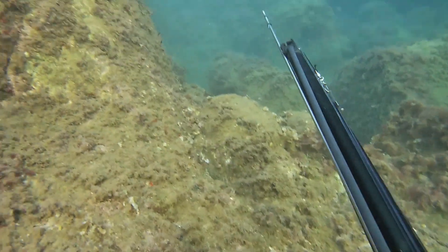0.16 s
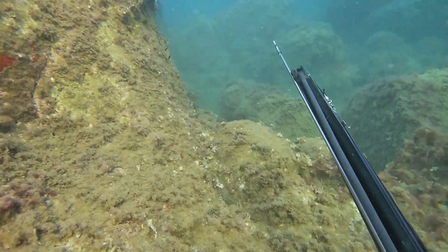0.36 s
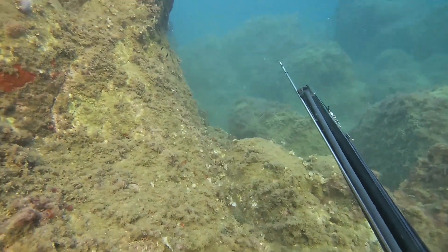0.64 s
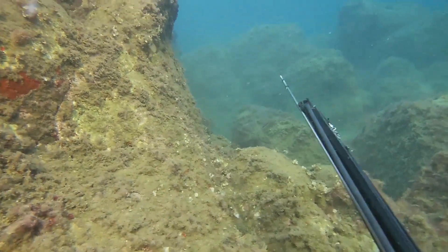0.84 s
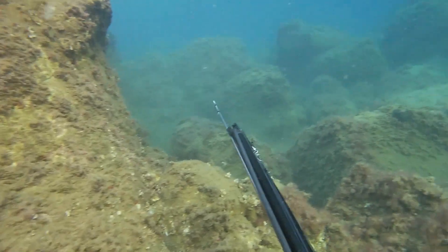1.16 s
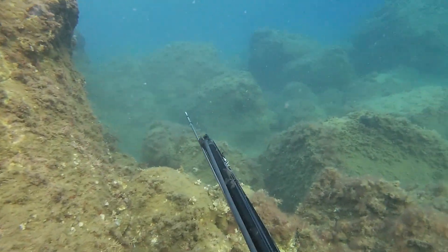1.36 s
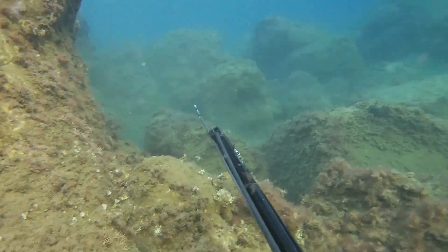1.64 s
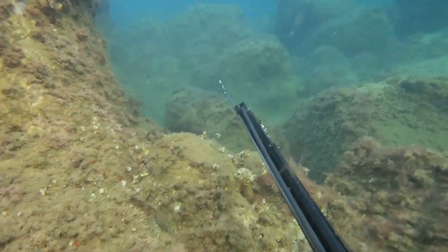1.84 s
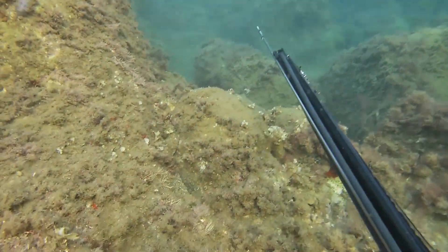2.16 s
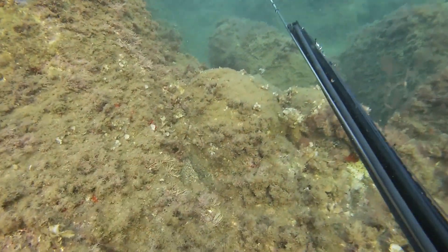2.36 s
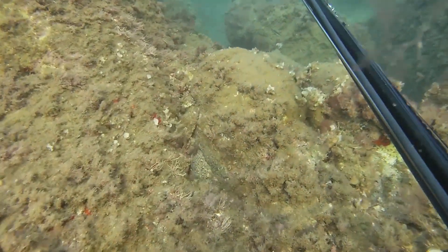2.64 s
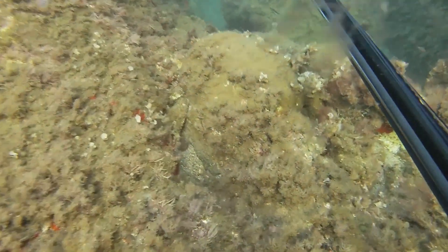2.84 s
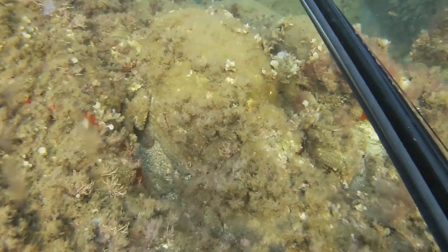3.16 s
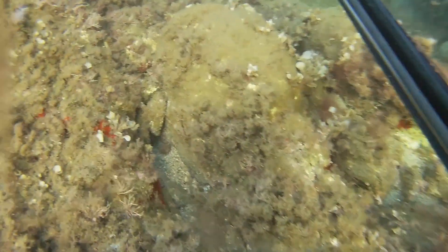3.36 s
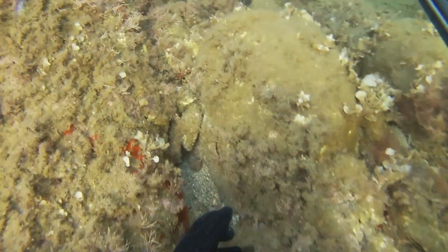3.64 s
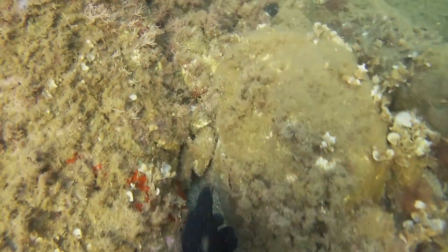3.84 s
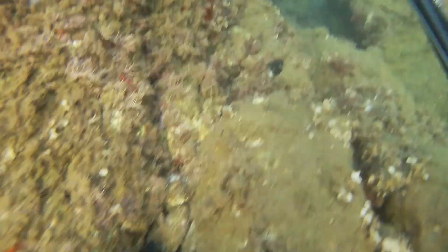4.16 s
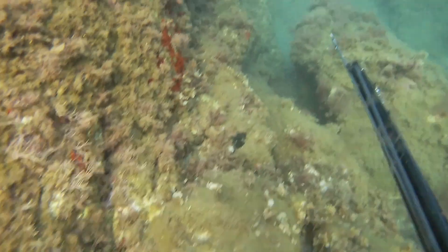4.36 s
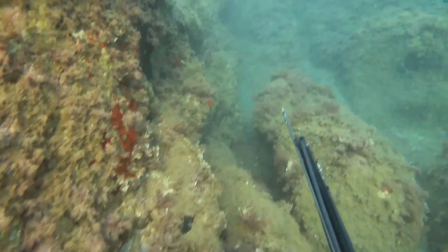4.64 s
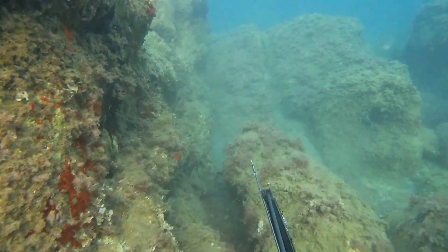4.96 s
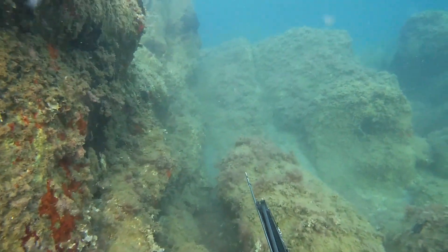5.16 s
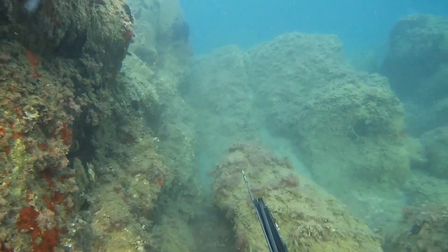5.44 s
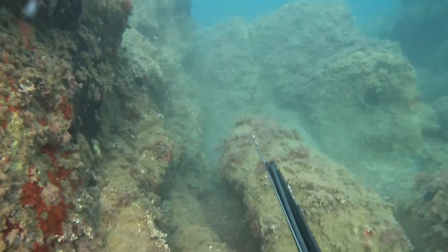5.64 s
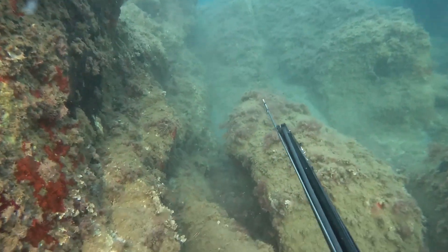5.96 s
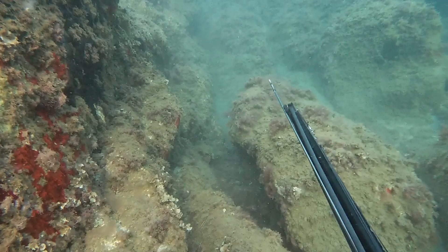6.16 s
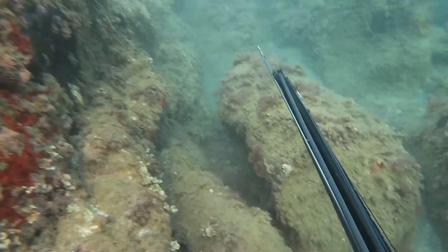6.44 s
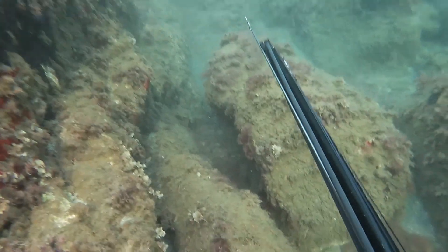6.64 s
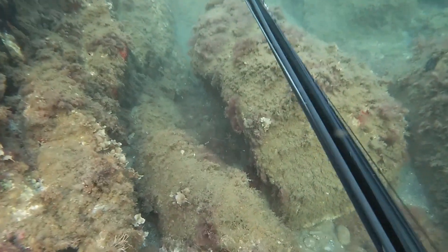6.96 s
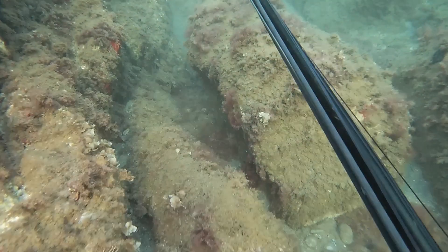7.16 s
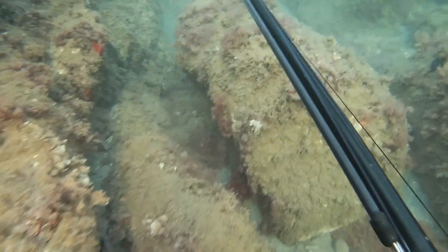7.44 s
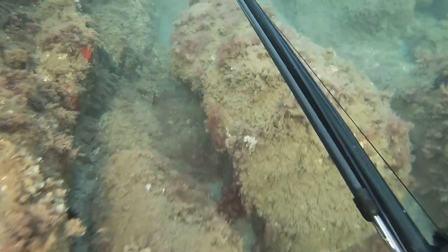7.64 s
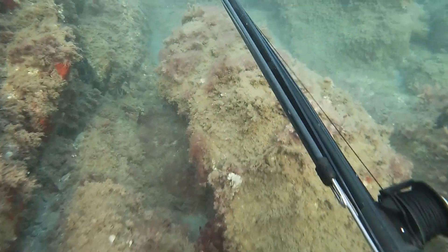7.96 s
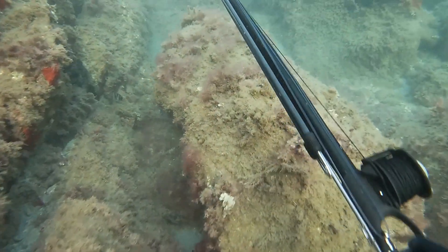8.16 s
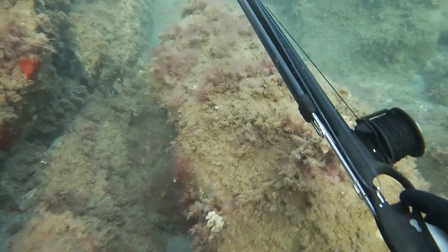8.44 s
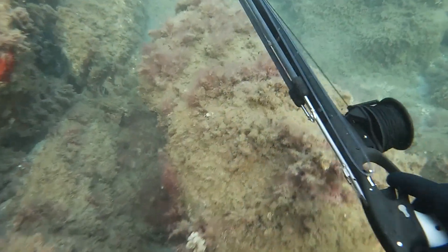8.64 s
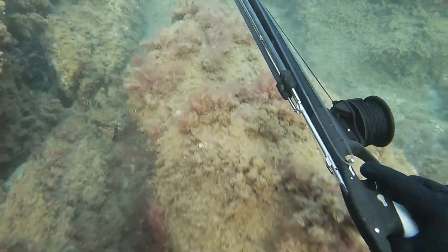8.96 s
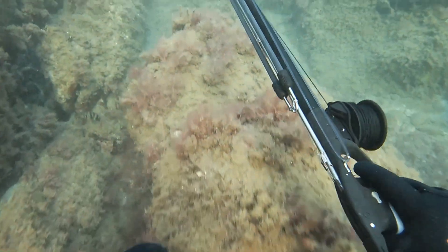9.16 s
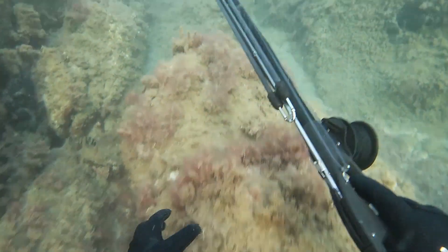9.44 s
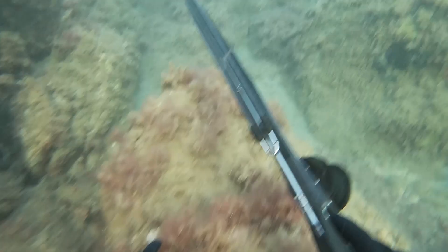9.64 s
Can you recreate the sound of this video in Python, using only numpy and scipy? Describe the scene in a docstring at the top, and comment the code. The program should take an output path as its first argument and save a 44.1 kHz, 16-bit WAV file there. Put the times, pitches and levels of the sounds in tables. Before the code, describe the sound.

Underwater reef crackling like dry twigs, loud clicks over faint sizzle, while a gliding diver's camera housing hums, rumbles and occasionally knocks.

```python
"""A rocky seabed alive with snapping shrimp, heard through the case of a diver's underwater camera.
Each snap is a collapsing bubble: a sharp pulse, scattered by the rocks, that rings the case.
Random snaps and a faint sizzle fill in the reef behind the loud, near shrimp.
As the diver glides, water hums and rumbles on the case, gear rubs and knocks, and bubbles gurgle."""
import sys
import numpy as np
from scipy import signal
from scipy.fft import rfft, irfft
from scipy.io import wavfile
from scipy.ndimage import uniform_filter1d

SR = 44100
rng = np.random.default_rng(int(sys.argv[2]) if len(sys.argv) > 2 else 0)


def inscribe(sig):
    """Save sig as 16-bit PCM at rate SR to the path in sys.argv[1].

    A 1-D sig is mono; a 2-D sig holds one channel per row.
    Samples are clipped to [-1, 1] before scaling.
    """
    pcm = np.round(np.clip(np.atleast_2d(sig).T, -1, 1) * 32767)
    wavfile.write(sys.argv[1], SR, pcm.astype(np.int16))


N = 432180  # length in samples

SIZE = 4096  # length of every short sound, in samples
HZ = np.fft.rfftfreq(SIZE, 1 / SR) + 1  # its frequencies, raised 1 Hz to keep logarithms finite
AGE = np.arange(SIZE) / SR  # seconds since it began

# how strongly the reef's random crackle comes through: t/s, level/dB
REEF_LEVEL = [(0, -56), (1.35, -54.5), (1.6, -53.5), (2.1, -53.5), (2.42, -57), (2.6, -56), (3.4, -57),
              (4.0, -58.5), (4.25, -59), (4.7, -58.5), (5.25, -56), (6.5, -58), (7.6, -58), (8.3, -57.5),
              (9.3, -58.5), (9.8, -60)]
# strokes that push the camera through the water: middle t/s, length/s, rumble level/dB, sway level/dB
STROKES = [(.2, 1, -58, -39), (1.7, 0.26, -55, -44.5), (3.05, 0.43, -52, -49), (3.596, 0.33, -58, -61),
           (4.225, 0.68, -47, -39), (4.794, 0.48, -44.5, -45), (5.768, 0.83, -49, -32.5),
           (6.78, 0.25, -49.5, -64), (8.393, 0.41, -49.5, -39), (9.769, 0.17, -55, -32.5)]


def amp(db):
    """Decibels to gain."""
    return 10 ** (np.asarray(db) / 20)


def evened(x):
    """Scales to rms 1."""
    return x / np.sqrt(np.mean(x ** 2) + 1e-20)


def level(rows):
    """A level curve in dB as a gain for every sample."""
    s, db = np.transpose(rows)
    return amp(np.interp(np.arange(N) / SR, s, db))


def colour(points):
    """A few spectrum points as a gain for every frequency in HZ."""
    hz, db = np.transpose(points)
    return amp(np.interp(np.log(HZ), np.log(hz), db))


def noise(gain):
    """Steady noise of the given colour, at rms 1."""
    spectrum = rfft(rng.standard_normal(N))
    return evened(irfft(spectrum * np.interp(np.fft.rfftfreq(N, 1 / SR), HZ, gain), N))


def flutter(per_s, depth_db):
    """A gain that wanders between random values, per_s of them a second."""
    knots = rng.standard_normal(N // 100)
    wander = np.interp(np.arange(N) / SR * per_s, np.arange(len(knots)), knots)
    return amp(depth_db * wander)


def arch(s, length_s):
    """A smooth swell and fade around a time."""
    return np.cos(np.pi * np.clip((np.arange(N) / SR - s) / length_s, -.5, .5)) ** 2


def add(mix, s, sound):
    """Mixes a sound in at a time."""
    part = mix[max(round(s * SR), 0):][:len(sound)]
    part += sound[:len(part)]


def ring(x, gain):
    """Passes a short sound through a causal, minimum-phase filter: sharp start, ringing after."""
    cepstrum = irfft(np.log(np.maximum(gain / gain.max(), 1e-5)))
    fold = 1 + np.sign(SIZE / 2 - np.arange(SIZE))  # moves the response wholly after the start
    return irfft(rfft(x) * np.exp(rfft(cepstrum * fold) - cepstrum[0]))


def housing(uneven_db=0):
    """What the case lets through; sound from any one direction rings its resonances unevenly."""
    # resonances of the case: f/Hz, width/Hz, level/dB
    resonances = [(640, 40, -16), (747.5, 40, -6), (925, 55.6, -2), (1121, 85, -4.5), (1299, 64, -5),
                  (1524, 83, 0), (1800, 94, 1.5), (2082, 117, -1.5), (2253, 99, -3.5), (2990, 260, -2),
                  (3227, 210, -2), (3630, 310, -11.5), (4263, 155, -3.5), (4586, 180, -3.5),
                  (5000, 160, -4.5), (5320, 350, -9), (6030, 810, -13), (7110, 230, -12.5),
                  (7835, 340, -12.5), (8525, 436, -14), (10670, 620, -25.5), (12700, 1200, -32.5)]
    hz, width, db = np.transpose(resonances)
    db = db + uneven_db * rng.standard_normal(len(db))
    peaks = amp(db) / (1 + ((HZ[:, None] - hz) / width) ** 2)
    return np.sqrt(np.sum(peaks ** 2, axis=1))


def swishes(centre_hz=360):
    """Eddies brush the case: noise in a low band, with soft swells."""
    # swells of moving water: middle t/s, length/s, level/dB
    swells = [(0.248, 2.1, -68), (3.3, 6.4, -73.5), (5.063, 0.088, -63)]
    band = 1 / (1 + (2 * np.log2(HZ / centre_hz)) ** 4)
    return noise(band) * sum(amp(db) * arch(s, length_s) for s, length_s, db in swells)


def swings(swing_hz=10.3):
    """Each stroke sways the case: a slow pressure wave under the rumble."""
    wave = np.sin(2 * np.pi * (swing_hz * np.arange(N) / SR + rng.random()))
    return evened(wave) * sum(amp(db) * arch(s, length_s) for s, length_s, _, db in STROKES)


def swimming(glide_db=-54.5, waver_db=2.8):
    """Water flowing past makes the case hum in lumps; each stroke buffets it with a rumble."""
    # strength of the hum as the flow changes: t/s, level/dB
    flow = [(0, -63.5), (.3, -62), (.6, -70.5), (1.25, -67.5), (1.48, -63), (1.68, -56), (1.8, -72.5),
            (2.2, -78.5), (2.7, -69), (3.1, -64), (3.7, -61), (4.0, -61), (4.3, -65), (4.55, -63),
            (4.8, -63), (5.6, -66), (6.1, -64.5), (6.5, -70), (7.0, -69), (7.17, -61), (7.3, -68),
            (7.58, -66.5), (7.75, -71.5), (8.35, -63.5), (8.5, -68.5), (9.0, -64), (9.35, -62.5),
            (9.8, -62.5)]
    # colour of the hum: f/Hz, level/dB
    hum_colour = [(60, -14), (105, -12), (146, 2), (188, -2), (260, -16.5), (400, -21), (700, -39),
                  (1500, -73)]
    # colour of the rumble: f/Hz, level/dB
    rumble_colour = [(8, 1.5), (22, -4.5), (38, -3), (48, -14), (62, -30.5), (110, -34.5), (300, -57),
                     (1000, -100)]
    hum = level(flow) * noise(colour(hum_colour)) * flutter(per_s=15, depth_db=waver_db)
    glide = amp(glide_db) * flutter(per_s=8, depth_db=waver_db)
    push = glide + sum(amp(db) * arch(s, length_s) for s, length_s, db, _ in STROKES)
    return hum + push * noise(colour(rumble_colour)) + swishes() + swings()


def bubble(hz):
    """The very short note of one small bubble: a sine that swells, then rings down."""
    ring_s = .004
    return AGE * np.exp(-AGE / ring_s) * np.sin(2 * np.pi * hz * AGE) / hz


def blips(count=16):
    """Small bubbles of many sizes, born at random."""
    low_hz, high_hz, per_s = 610, 1300, 130
    out = np.zeros(N)
    for hz in np.geomspace(low_hz, high_hz, count):
        births = rng.uniform(-0.86, 1, N) * (rng.random(N) < per_s / count / SR)
        out += signal.oaconvolve(births, bubble(hz))[:N]
    return evened(out)


def gurgles(count=5):
    """A few bubbles of like size break loose one after another."""
    # flurries of bubbles: start t/s, rms level/dB, middle pitch f/Hz
    flurries = [(2.97, -56, 770), (3.04, -55.5, 760), (3.131, -54.5, 865), (3.21, -58, 716),
                (5.554, -60, 640), (5.665, -60, 640)]
    flurry_s, spread_octaves = .03, .08
    out = np.zeros(N)
    for s, db, hz in flurries:
        flurry = np.zeros(SIZE)
        for k in range(count):
            birth_s = flurry_s * (k + rng.random()) / count
            add(flurry, birth_s, bubble(hz * 2 ** rng.normal(0, spread_octaves)))
        add(out, s, amp(db) * flurry / np.std(flurry[AGE < flurry_s]))
    return out


def bout(start_s, length_s):
    """A rub starts quickly, slackens as it goes on, then dies away."""
    attack_s, sag_db_per_s, release_s = 0.0038, 0.5, 1
    t = np.maximum(np.arange(N) / SR - start_s, 0)
    release = np.exp(-np.maximum(t - length_s, 0) / release_s)
    return np.minimum(t / attack_s, 1) * amp(-sag_db_per_s * t) * release


def rubbing(case, rest_db=-70.5, blips_db=-7.5):
    """Gear rubs in bouts: a hush in the low resonances of the case, with small bubbles freed."""
    # bouts of rubbing as the diver shifts: start t/s, length/s, level/dB
    rubs = [(0, 0.72, -59.5), (1.885, 0.74, -61.5), (2.966, 0.22, -56.5), (3.484, 0.13, -65),
            (5.086, 0.31, -61), (8.9, 0.55, -69.5)]
    rub_hz, rub_octaves, low_db = 780, 0.81, -18.5
    case_band = case / (1 + (np.log2(HZ / rub_hz) / rub_octaves) ** 4)
    low_hush = amp(low_db) / (1 + (HZ / rub_hz) ** 4)
    texture = noise(case_band + low_hush) + amp(blips_db) * blips()
    power = amp(rest_db) ** 2 + sum((amp(db) * bout(s, length_s)) ** 2 for s, length_s, db in rubs)
    return np.sqrt(power) * flutter(per_s=18, depth_db=1.0) * texture


def gear(case, octaves=0.69):
    """Blunt knocks ring the low resonances of the case, with a brief rattle and a low thud."""
    # dull knocks: t/s, clack peak level/dB, centre f/Hz, thud level against the clack/dB
    knocks = [(.671, -32, 1020, -25), (2.815, -28.5, 950, -12), (3.784, -32, 1070, -32),
              (4.138, -37.5, 1030, -10), (7.4376, -29.5, 1040, -12), (7.4418, -30.5, 716, -2),
              (7.927, -35, 690, -34), (8.988, -42.5, 880, -7)]
    # colour of the thud: f/Hz, level/dB
    thud_colour = [(40, -27), (135, 7.5), (200, 5.5), (270, -0.5), (350, 0.5), (480, 3.5), (700, 6),
                   (2000, -58)]
    rattle_db = -2
    out = np.zeros(N)
    for s, db, hz, low_db in knocks:
        clack = ring(paths(rattle_db), case / (1 + (np.log2(HZ / hz) / octaves) ** 4))
        thud = ring(AGE == 0, colour(thud_colour))
        add(out, s, amp(db) * (clack / abs(clack).max() + amp(low_db) * thud / abs(thud).max()))
    return out


def snap_colour(case, tilt_db, split_hz=5400, steepness=4):
    """A tiny bubble gives little bass; the tilt lifts or lowers the treble the case lets through."""
    bass_limit_hz = 1230
    treble = (1 + np.tanh(np.log(HZ / split_hz) * steepness)) / 2
    return case * amp(tilt_db * treble) / np.sqrt(1 + (bass_limit_hz / HZ) ** 5)


def bubble_size(peak_db, usual_hz=12000, doubling_db=19):
    """A louder snap comes from a bigger bubble, whose slower collapse has less top."""
    cut_hz = usual_hz * 2 ** (-(peak_db + 34.0) / doubling_db)
    return 1 / np.sqrt(1 + (HZ / cut_hz) ** 4)


def paths(scatter_db, crevice_s=0.0011, cluster_db=5):
    """The direct pulse, a cluster from the shrimp's crevice, then echoes from rocks near and far."""
    early_s, late_s, echoes_per_s = .0044, .018, 2000
    late_db = 1.5 + 0.82 * scatter_db  # a hidden shrimp is heard more by way of far rocks
    cluster_s = crevice_s * amp(.55 * scatter_db)  # and its snap builds up more slowly

    def burst(taps, fade_s):
        """Random taps that build up, then fade."""
        shape = np.exp(-AGE / fade_s) * (1 - np.exp(-AGE / cluster_s))
        return evened(taps * shape) / np.sqrt(SIZE)

    cluster, early, late = rng.standard_normal((3, SIZE))
    # sparse taps make separate echoes
    early, late = np.array([early, late]) * (rng.random((2, SIZE)) < echoes_per_s / SR)
    echoes = burst(early, early_s) + amp(late_db) * burst(late, late_s)
    # a shrimp out in the open gives both a cleaner pulse and weaker echoes
    crevice = amp(cluster_db + scatter_db / 2) * burst(cluster, cluster_s)
    return (AGE == 0) + crevice + amp(scatter_db) * echoes


def snap(size_gain, tilt_db, pop_hz, scatter_db, pop_db=5, octaves=0.31, crest_db=14):
    """One snap, peak about 1: its bubble sets the broad colour, direction and rocks ripple it."""
    direction_db = 2
    pop = amp(pop_db * np.exp(-(np.log2(HZ / pop_hz) / octaves) ** 2))
    arrivals = paths(scatter_db)
    broad = np.sqrt(uniform_filter1d(abs(rfft(arrivals)) ** 2, size=210))
    # dividing by the broad spectrum keeps only the fine ripple of the echoes
    sound = ring(arrivals, snap_colour(housing(direction_db), tilt_db) * size_gain * pop / broad)
    body = np.std(sound[AGE < .012])
    return sound / body / amp(crest_db)


def colony(per_s, top_db, range_db, tilt_db, scatter_db, low_hz=2100, high_hz=9000, pop_db=9, count=24):
    """Shrimp in many crevices snap at random; the farther, the more of them and the fainter."""
    treble_db_per_octave = 5.5  # higher pops are brighter
    out = np.zeros(N)
    for pop_hz in np.geomspace(low_hz, high_hz, count):
        chance, place = rng.random((2, N))
        treble_db = tilt_db + treble_db_per_octave * np.log2(pop_hz / 4500)
        sound = snap(1, treble_db, pop_hz, scatter_db, pop_db=pop_db)
        for at in np.flatnonzero(chance < per_s / count / SR):
            add(out, at / SR, amp(top_db - range_db * np.sqrt(place[at])) * sound)
    return out


def far_reef(case, sizzle_db=-7.5):
    """Tiny dry ticks of many pitches over a faint sizzle; both swell as the rocks open the view."""
    ticks = colony(per_s=230, top_db=17.5, range_db=17, tilt_db=1.5, scatter_db=-3, count=40)
    sizzle = noise(snap_colour(case, tilt_db=10.5)) * flutter(per_s=92, depth_db=4.5)
    bunching = flutter(per_s=25, depth_db=1.9)
    return level(REEF_LEVEL) * bunching * (ticks + amp(sizzle_db) * sizzle)


def neighbours():
    """Shrimp a little farther off give short, bright snaps at random, louder where the reef is busy."""
    snaps = colony(per_s=17, top_db=24.5, range_db=6.0, tilt_db=7.0, scatter_db=1,
                   low_hz=1590, high_hz=8000, pop_db=10.5, count=32)
    return level(REEF_LEVEL) * snaps


def near_shrimp():
    """The loud snaps, each with its own bubble size, brightness, pitch and echoes."""
    # one row a snap: t/s, approximate peak level/dB, extra treble/dB, pop f/Hz, scatter off the rocks/dB
    near_snaps = [(0.188, -27.0, 4, 2570.0, -0.5), (0.2133, -29, -7, 2810.0, 26),
                  (0.255, -31, 7, 3360.0, 6), (0.33, -30, -5, 5750.0, 8), (0.441, -29.5, 3, 3360.0, 8),
                  (0.4537, -30, -7, 4000, 5), (0.6022, -27, 15, 8350, -5), (0.6685, -29.5, 5, 1500.0, 9),
                  (0.8156, -24.5, 12.5, 3070.0, -1), (0.869, -31.5, 4, 3210.0, 1),
                  (1.1078, -33, 5, 5030.0, -13), (1.183, -29.5, 35, 3210.0, -1),
                  (1.232, -31.5, 13, 5500.0, 7), (1.2562, -19.5, -1, 3220, -2), (1.442, -32, -6, 3100, 11),
                  (1.482, -28, -12, 4200.0, 4), (1.536, -33, 6, 2050.0, 1), (1.553, -26.5, -17, 2640, 10),
                  (1.6066, -24.5, -3, 8600.0, 0), (1.71, -31.5, 10, 8600.0, 7), (1.797, -28, -11, 3300, 2),
                  (1.836, -32, -19, 4020.0, 7), (1.9075, -25, 2, 3210.0, -2),
                  (1.9418, -29.5, -3, 3840.0, 12), (2.0534, -30.5, 8, 2160, 1),
                  (2.0906, -21.5, 3.5, 4000, -4), (2.1668, -24.5, 11, 3700, -2),
                  (2.2302, -18, 4.5, 2570, -0.5), (2.2534, -23.5, 2, 8800, -4.5),
                  (2.5095, -32, -10.0, 8600.0, 9), (2.538, -25, -11, 8600.0, 4),
                  (2.5783, -21.5, -22, 2900, 1), (2.615, -29, 3, 6290.0, 6), (2.6365, -16.5, 3.5, 2740, 0),
                  (2.779, -21, 11, 4740, 0.5), (3.032, -28.0, -8, 4330, 7), (3.08, -29.5, 7, 3070.0, 7),
                  (3.1285, -29, 3, 4590.0, 3), (3.156, -28.5, 3, 2760, 3), (3.3856, -29.5, 8.5, 3120, 4),
                  (3.4685, -24.5, 11, 3200, 2.5), (3.5639, -27.5, 0, 2150.0, 0),
                  (3.7221, -31.5, 7, 3050, 11), (3.843, -22, 2, 1630, 1.5), (3.8894, -27, 5, 5500.0, -1.5),
                  (4.1307, -30.5, 6, 1500.0, 3), (4.174, -30, 14, 2570.0, 8), (4.322, -31, 2, 2660, 6.0),
                  (4.3917, -23.0, 3, 2570.0, -7), (4.4464, -20, -1, 4530, -1.5),
                  (4.4663, -27.5, 13, 8140, -7), (4.6212, -31, 5, 3160, 12),
                  (4.789, -29.5, 2, 4590.0, -6.5), (4.875, -25, 7, 4170, 3), (4.9842, -31, 4.5, 2250, 11),
                  (5.0822, -27.5, 3, 5200, 3), (5.1157, -29, 10, 2820, 5.5), (5.1857, -27.5, 7, 2920, 5),
                  (5.2099, -22.5, 11, 2020, 1.5), (5.336, -30.5, -7, 2450.0, 6),
                  (5.4066, -20, -4, 2320, -5.5), (5.4773, -28.5, -26, 2240.0, -9),
                  (5.5036, -21, 8, 4800, -6), (5.5377, -29.5, -1, 3210.0, 1),
                  (5.6221, -31.5, 11, 3210.0, -2), (5.7103, -28, -4, 8600.0, 5), (5.8256, -28, 1, 3720, -3),
                  (5.8954, -24, -2, 3000, 8.5), (5.9237, -26.5, 4, 3400, -1), (6.0576, -26.5, -15, 1780, 4),
                  (6.1722, -21, 1, 3080, -1), (6.485, -31.5, 6, 1710, -15), (6.6308, -31.5, 6, 1510, -1),
                  (6.6567, -33.5, 24, 3210.0, -3), (6.7942, -19.5, -10, 2670, 4),
                  (6.855, -23, 5, 1640, 0.5), (7.001, -25.5, 16.5, 4040, 6),
                  (7.2363, -17.5, -0.5, 2820, -6), (7.3584, -29.5, -1, 3230, 3.5),
                  (7.4407, -25.5, 4, 1800, -2), (7.525, -32.5, 9.0, 5800, -1),
                  (7.7289, -12.5, 9.5, 5200, -10.5), (7.925, -20.5, 1.5, 2680.0, 7),
                  (7.954, -30, 11, 2570.0, -2), (8.0795, -26, -6, 2840, 5.5),
                  (8.1329, -32.5, -23, 1480, 13.0), (8.288, -27, 6, 3600, 19),
                  (8.3159, -20.5, -2, 3100, -5), (8.336, -33, 12, 4020.0, 8),
                  (8.4602, -31.5, 12, 4200.0, 2), (8.4984, -26, -5, 2160, -1.5),
                  (8.6, -23.5, -3, 2700, 2.5), (8.665, -27, 4, 3300, 2), (8.7214, -28.5, 5, 6040, -4),
                  (8.7864, -27, 3.5, 2110, 1.5), (8.9512, -30.5, 0, 6010.0, 5),
                  (9.0392, -33, 1, 2570.0, -5), (9.212, -29, 4, 5300, -1), (9.304, -23.5, 8, 3930, 3),
                  (9.3298, -29, 15, 5830, -6), (9.3585, -28, 8, 5500.0, 5), (9.3774, -30, -4, 3730, 6),
                  (9.424, -26.0, 3, 1500.0, -0.5), (9.5228, -27, 0, 1980, 3)]
    out = np.zeros(N)
    for s, db, treble_db, pop_hz, scatter_db in near_snaps:
        add(out, s, amp(db) * snap(bubble_size(db), treble_db, pop_hz, scatter_db))
    return out


def stereo(mono, lead_turns=0.19):
    """Nearly the same sound in both channels; they differ only in the highest treble."""
    # difference between left and right against their common sound: f/Hz, level/dB
    side_colour = [(500, -63), (2000, -95), (4000, -52.5), (9000, -38), (11000, -27), (12000, -9),
                   (16000, 7)]
    gain = np.interp(np.fft.rfftfreq(N, 1 / SR), HZ, colour(side_colour))
    side = irfft(rfft(mono) * gain * np.exp(2j * np.pi * lead_turns), N)
    return np.array([mono + side, mono - side])


def scene():
    """The diver's own small noises, and shrimp far and near."""
    case = housing()
    diver = swimming() + rubbing(case) + gurgles() + gear(case)
    shrimp = far_reef(case) + neighbours() + near_shrimp()
    return stereo(diver + shrimp)


def record(dry):
    """The camera's band limit: a steep low-pass."""
    edge_hz = 15700
    low_pass = signal.firwin(511, edge_hz, window=("kaiser", 9), fs=SR)
    return signal.oaconvolve(dry, low_pass[None], "same")


dry = scene()
out = record(dry)
inscribe(out)
```